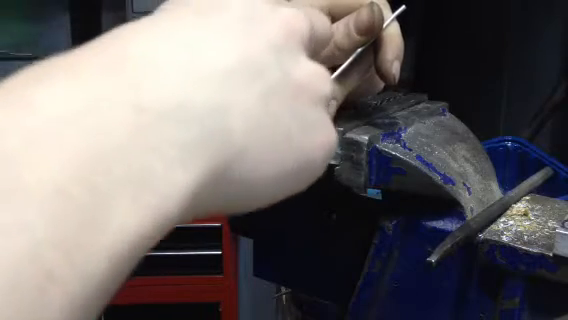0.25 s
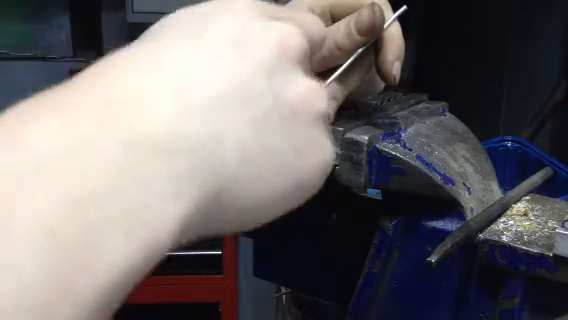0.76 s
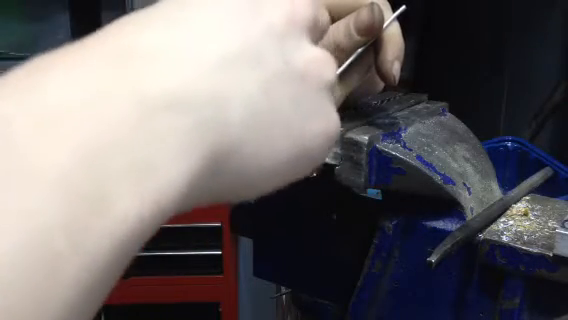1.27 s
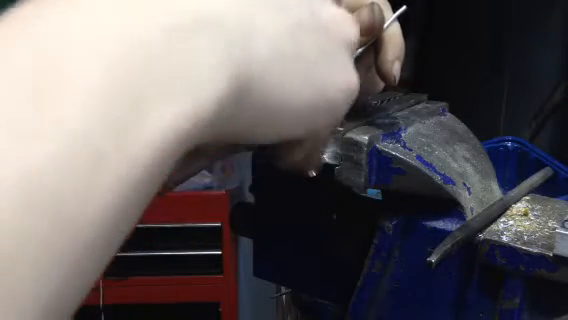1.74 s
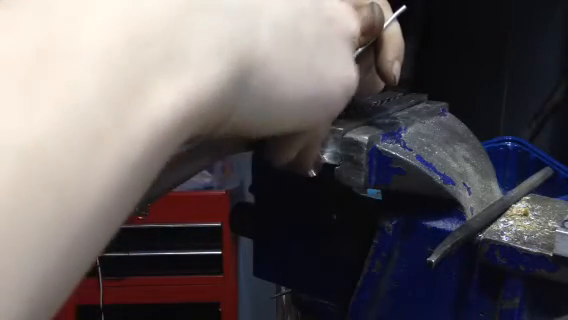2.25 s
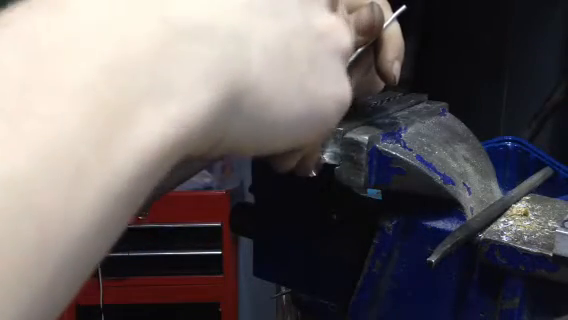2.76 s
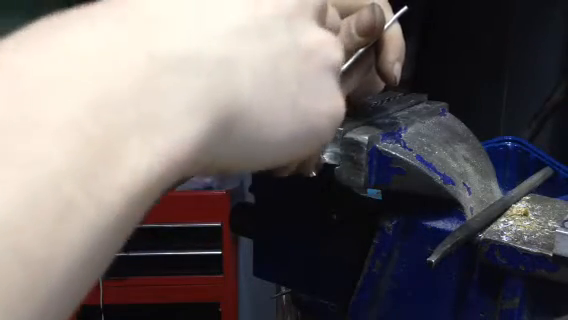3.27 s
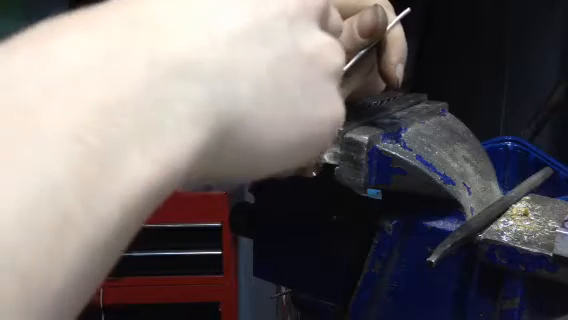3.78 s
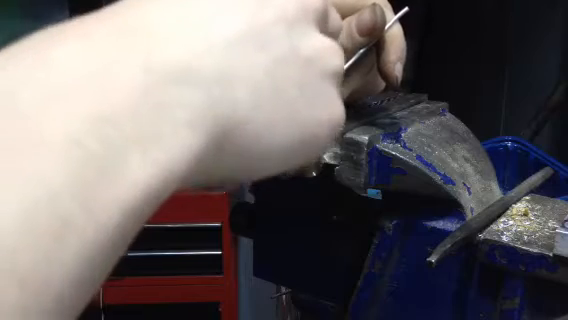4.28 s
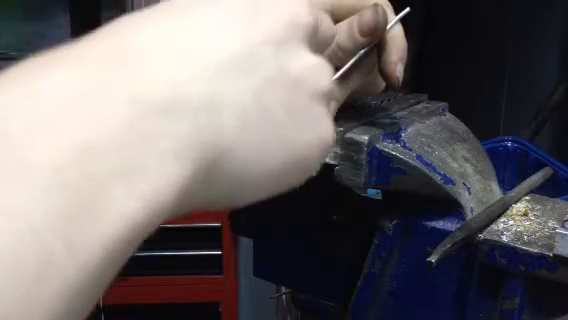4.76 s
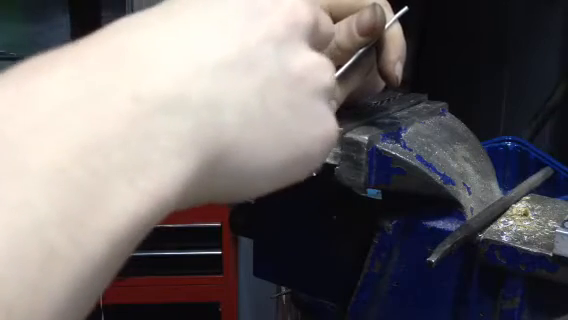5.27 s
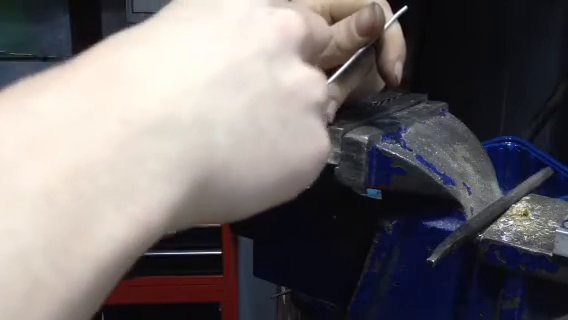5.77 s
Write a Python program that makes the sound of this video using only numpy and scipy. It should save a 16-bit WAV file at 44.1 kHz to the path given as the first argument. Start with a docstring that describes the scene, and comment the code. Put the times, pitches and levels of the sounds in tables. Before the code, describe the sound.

A quiet, steady electrical hum, low with a raspy high-pitched buzz, lies over faint hiss for the whole six seconds; its high edge dips slightly around 0.7 and 1.5 s. A very faint scrape of the pick opens the scene, leading to a modest, bright metallic click at 0.21 s. A barely audible dull tick and scrape pass at 0.85 s. Then mostly hum until a tiny scrape and soft touch at 2.4 s and a faint low bench thud at 2.5 s. The hardest, loudest snap strikes at 2.8 s, steel ringing briefly over a dull vise knock. Another crisp snap follows at 3.2 s. A tight, brighter double click comes at 4.47 s, faint ticks at 5.2 and 5.45 s, and a strong double snap at 5.89 s with a small trailing click. Close microphone; short, small-room reflections.

```python
"""Lock picking in a vise

In a small workshop a pick works the pins of a lock clamped in a bench vise. Pins let go in snaps of shaped
noise; steel rings as decaying sines, and the vise knocks as damped resonances under a soft push. Faint
scrapes of noise and one low bench thud join in. Snaps and knocks excite a short noise-built room tail.
Below lie a lamp ballast, summed from wavering partials, and a faint hiss of shaped noise."""
import sys
import numpy as np
from scipy import signal
from scipy.fft import rfft, irfft
from scipy.io import wavfile
from scipy.ndimage import uniform_filter1d

SR = 44100
rng = np.random.default_rng(int(sys.argv[2]) if len(sys.argv) > 2 else 0)


def materialize(psi):
    """Save the field psi as 16-bit PCM at rate SR to the path in sys.argv[1].

    A 1-D psi becomes a single channel; in a 2-D psi each row is a channel.
    """
    bounded = np.clip(np.atleast_2d(psi).T, -1, 1)
    quanta = np.round(bounded * 32767).astype(np.int16)
    wavfile.write(sys.argv[1], SR, quanta)


N = 265967

# Steady hiss of room and microphone. Each row: frequency in Hz, relative density in dB per Hz.
HISS_COLOUR = [(25, -9), (70, -12), (130, 3.5), (220, 8.5), (400, 2.5), (900, -2), (1600, -2.5), (3000, -4),
               (4600, -4.5), (6300, 1), (8000, -13), (10000, -16), (12500, -12), (15000, -8)]
HISS_DB = -70.5

# Partials of the ballast. Each row: multiple of the buzz rate, level in dB relative to HUM_DB.
BALLAST_PARTIALS = [(1, -20), (2, 0), (3, -23), (4, -18), (5, -22), (6, -29), (7, -22), (8, -32), (9, -35),
                    (10, -32), (11, -27), (12, -24), (13, -16), (14, -20), (15, -26), (16, -23), (17, -33),
                    (18, -32), (19, -24), (20, -34), (21, -28), (22, -24), (23, -24), (24, -31), (25, -32),
                    (26, -32), (27, -24), (28, -22), (29, -22), (30, -28), (31, -21), (32, -32), (33, -29),
                    (34, -23), (35, -32), (36, -25), (37, -9), (38, -11), (39, -17), (40, -20), (41, -29),
                    (42, -27), (43, -22), (44, -26), (45, -29), (46, -31), (47, -14), (48, -23), (49, -28),
                    (50, -30), (51, -23), (52, -22), (53, -23), (54, -32), (55, -38), (56, -34), (57, -28),
                    (58, -35), (59, -32), (60, -38), (61, -36), (62, -33), (63, -35), (64, -31), (65, -30),
                    (66, -39), (67, -42), (68, -40), (69, -38), (70, -42), (71, -45), (72, -47), (73, -43),
                    (74, -46), (75, -44), (76, -41)]
BUZZ_HZ, HUM_DB = 119.986, -58.5
# The picking hand rises into the path of the high buzz (minus) or sinks clear of it (plus).
# Each row: middle in seconds, half length (to 1/e) in seconds, change in dB.
HAND_MOVES = [(0.72, 0.25, -1.5), (1.55, 0.14, -2), (2.8, 1.6, 0.56)]
# Highest partials: level with the hand at rest, rms waver; both shrink to nothing below 1 kHz.
HIGH_BUZZ_DB, WAVER_DB = 1.06, 1

# Decay of the workshop. Each row: frequency in Hz, t60 in seconds.
ROOM_DECAY = [(200, 0.37), (700, 0.19), (1500, 0.19), (4000, 0.17), (8000, .15), (14000, .13)]

# Colour of the keyway scrape. Each row: frequency in Hz, relative density in dB per Hz.
SCRAPE_COLOUR = [(300, -9), (800, -4), (1300, -18), (1600, 2), (1800, 9.5), (2050, -11), (2400, 3),
                 (3300, -2.5), (5000, -12), (9000, -34)]
# Strokes of the pick in the keyway. Each row: start in seconds, length in seconds, level in dB before grain.
STROKES = [(0.0, 0.12, -65.5), (0.848, 0.06, -77), (2.397, 0.037, -73)]
STROKE_ATTACK_S, STROKE_RELEASE_DB_PER_S = 0.0053, 130

# Low resonances of the bench. Each row: frequency in Hz, level in dB, t60 in seconds.
BENCH_MODES = [(208, -54, 0.2), (360, -47.5, 0.032)]
BUMP_S = 2.519

# Dull knocks of the lock against the vise jaws. Each row: start in seconds, level in dB, pitch factor,
# extra level of the lowest resonance in dB.
KNOCKS = [(0.2150, -42.5, 1.0, -12), (0.8510, -62, 1, -5), (2.4060, -62.5, 1.02, 7),
          (2.4320, -67, 0.94, 20.5), (2.8062, -29, 1.07, -4.5), (3.2228, -31, 1.01, 2.5),
          (4.4755, -34.5, 0.99, 4), (5.1985, -59, 1.1, 2), (5.2030, -55.5, 0.97, 8), (5.4590, -60, 1.04, 5),
          (5.8902, -29.5, 1.02, -10)]
# Damped resonances of the clamped lock. Each row: frequency in Hz, relative level in dB, t60 in seconds.
CLAMP_MODES = [(660, -14, 0.044), (1186, -15.5, 0.095), (1474, 0.5, 0.036), (1589, -0.5, 0.036),
               (1900, -5.5, 0.0092)]

# Pin snaps and pick rebounds; where the pick is touched favours one band. Each row: start in seconds,
# level in dB, treble above 9 kHz in dB, body below 1 kHz in dB, ring in dB, favoured band in Hz, its lift in dB.
SNAPS = [(0.2090, -45, -14, 7, 7, 3920, 3), (0.2133, -31.5, -10, -2, -1, 4100, 8),
         (0.848, -56.5, -4, 14, 1, 870, 14), (2.8040, -24, -4, 1.5, 2.5, 4400, 2),
         (3.22, -28, 2.5, 5.5, 0, 14500, 3), (4.4709, -27, 1, 1, 6, 7300, 5),
         (4.4796, -30.5, 5.5, -11, -3.5, 6100, 7.5), (5.4541, -55, 6, 5, -2, 1900, 5),
         (5.889, -26.5, 1, -3, -4, 3470, 3.5), (5.8947, -29, -3, 10.5, -1.5, 2200, 10.5),
         (5.9145, -39, -8, -1, -9, 3450, 19)]
# Colour of a snap. Each row: frequency in Hz, relative density in dB per Hz.
SNAP_COLOUR = [(50, -48), (150, -16), (450, -14), (850, -11), (1500, 0), (2600, -3.5), (3900, 3.5),
               (5100, -3.5), (6000, -1), (7800, -4), (9700, -19), (12200, -20.5), (14500, -16.5)]
# Bright pick-tip resonances lifting that colour. Each row: frequency in Hz, half width (to 1/e) in Hz, lift in dB.
TIP_LIFTS = [(10900, 520, 1.5), (12260, 500, 6), (14100, 480, 3)]
# Ringing of pick, lock and vise. Each row: frequency in Hz, relative level in dB, t60 in seconds.
STEEL_MODES = [(1179, -13, .16), (1480, -4, .15), (1600, -12, .12), (1712, -14, .13), (1937, -4, .13),
               (2110, -16, .12), (2250, -16, .16), (2480, -15, .11), (2931, -11, .12), (2979, -7, .12),
               (3500, -14, .12), (3603, -14, .14), (3879, -8, .12), (3977, -7, .13), (4215, -10, .1),
               (4380, -11, .12), (4626, -10, .15), (4802, -15, .13), (5141, -17, .11), (5520, -15, .1),
               (5762, -10, .12), (5930, -11, .1), (6013, -7, .13), (6250, -17, .14), (7386, -15, .09),
               (7700, -18, .1)]
# First, hardest contact: decay, and treble level relative to the later chatter.
HARD_T60_S, HARD_DB = 0.034, 3.5

EDGE_HZ = 15330


def gain_of(db):
    """Decibels to amplitude."""
    return 10 ** (np.asarray(db) / 20)


def evened(x):
    """Scales to an rms of one."""
    return x / np.sqrt(np.mean(x ** 2) + 1e-20)


def read(points, hz):
    """Interpolates a table on a logarithmic frequency axis."""
    f, value = np.transpose(points)
    return np.interp(np.log(hz + 1), np.log(f + 1), value)


def add(mix, start_s, sound):
    """Mixes a sound in at a given time."""
    part = mix[max(round(start_s * SR), 0):][:len(sound)]
    part += sound[:len(part)]


def fade(t, t60_s):
    """Exponential decay by 60 dB in t60."""
    return np.exp(-np.log(1000) * t / t60_s)


def hump(x, centre, width):
    """Bell of height one, in frequency or in time."""
    return np.exp(-((x - centre) / width) ** 2)


def mode(t, hz, t60_s):
    """One dying vibration, started at a random phase."""
    return fade(t, t60_s) * np.sin(2 * np.pi * (hz * t + rng.random()))


def noise(colour):
    """Steady noise of a given spectrum, rms one."""
    spectrum = rfft(rng.standard_normal(N))
    gain = gain_of(read(colour, np.fft.rfftfreq(N, 1 / SR)))
    return evened(irfft(spectrum * gain, N))


def causal(db):
    """Minimum-phase pulse: the most compact causal one with this spectrum, at unit energy."""
    log_gain = np.log(gain_of(np.concatenate([db, db[-2:0:-1]])))
    pulse = np.fft.ifft(np.exp(np.conj(signal.hilbert(log_gain)))).real
    return pulse / np.linalg.norm(pulse)


def rattle(envelope, passes=4):
    """Burst of random contacts: alternately flattens the spectrum and restores the envelope."""
    burst = envelope * rng.standard_normal(len(envelope))
    for _ in range(passes):
        burst = irfft(np.exp(1j * np.angle(rfft(burst))), len(envelope))
        power = abs(uniform_filter1d(burst ** 2, size=96))
        burst *= envelope / np.sqrt(power + 1e-14)
    return burst


def hiss():
    """Steady coloured noise of room and microphone."""
    return gain_of(HISS_DB) * noise(HISS_COLOUR)


def ballast(rattle_t60_s=0.048, waver_sines=12):
    """The core is pulled twice a mains cycle; each pull rattles it, and the upper partials waver a little."""
    t, slow_t = np.arange(N) / SR, np.linspace(0, N / SR, num=128)
    # partial phases of one decaying noise burst per pull
    cycle_t = np.arange(round(SR / BUZZ_HZ)) / SR
    phase = np.angle(rfft(rng.standard_normal(len(cycle_t)) * fade(cycle_t, rattle_t60_s)))
    shade_db = HIGH_BUZZ_DB + sum(db * hump(slow_t, s, half_s) for s, half_s, db in HAND_MOVES)
    buzz = np.zeros(N)
    for multiple, db in BALLAST_PARTIALS:
        k = round(multiple)
        waver = evened(sum(np.sin(2 * np.pi * (f * slow_t + rng.random())) / np.sqrt(f)
                           for f in np.geomspace(0.4, 4, waver_sines)))
        # long waves bend round the hands; only short ones are shaded
        shortness = np.clip((k * BUZZ_HZ - 1000) / 3500, 0, 1)
        level = gain_of(HUM_DB + db + shortness * (shade_db + WAVER_DB * waver))
        buzz += np.interp(t, slow_t, level) * np.cos(2 * np.pi * k * BUZZ_HZ * t + phase[k])
    return np.sqrt(2) * buzz


def workshop(x, first_s=0.0067):
    """Dense reflections from bench and walls, each band dying at its own speed."""
    hz, t, grid = signal.stft(rng.standard_normal(SR // 3), SR, nperseg=256)
    decay = fade(t, read(ROOM_DECAY, hz)[:, None])
    tail = signal.istft(grid * decay, SR, nperseg=256)[1]
    # silent until first_s, full at twice that
    tail *= np.clip(np.arange(len(tail)) / SR / first_s - 1, 0, 1)
    return signal.fftconvolve(x, tail / np.linalg.norm(tail))[:N]


def scrape(grain_db=2, grain_samples=130):
    """The pick scrapes along the keyway in strokes: quick hold, kept pressure, easing off; it catches unevenly."""
    t, pressure = np.arange(N) / SR, np.zeros(N)
    for start_s, length_s, level_db in STROKES:
        attack = np.clip((t - start_s) / STROKE_ATTACK_S, 0, 1)
        release_db = STROKE_RELEASE_DB_PER_S * np.maximum(t - start_s - length_s, 0)
        pressure += attack * gain_of(level_db - release_db)
    grain = evened(uniform_filter1d(rng.standard_normal(N), size=grain_samples))
    return noise(SCRAPE_COLOUR) * pressure * gain_of(grain_db * grain)


def bump(rise_s=0.005):
    """A hand nudges the bench: low modes sound as one faint thud."""
    t = np.arange(SR // 3) / SR
    thud = sum(gain_of(db) * mode(t, f, t60_s) for f, db, t60_s in BENCH_MODES)
    return (1 - np.exp(-t / rise_s)) * thud


def knock(level_db, pitch, depth_db, push_s=0.0059):
    """The lock rocks in the jaws: one soft push builds up its damped resonances."""
    t = np.arange(SR // 6) / SR
    push = np.sin(np.pi * np.minimum(t / push_s, 1))
    sound = np.zeros(len(t))
    for k, (f, db, t60_s) in enumerate(CLAMP_MODES):
        envelope = signal.fftconvolve(push, fade(t, t60_s))[:len(t)]
        gain = gain_of(db + depth_db * (k == 0))
        tone = np.sin(2 * np.pi * (f * pitch * t + rng.random()))
        sound += gain * envelope / envelope.max() * tone
    return gain_of(level_db) * sound


def snap(level_db, treble_db, body_db, ring_db, band_hz, band_db,
         rise_s=0.00048, t60_s=0.057, steel_db=-9, band_width=0.14, size=8192):
    """A pin lets go: metal chatters briefly and leaves the steel ringing; returns chatter and ring."""
    t, hz = np.arange(size) / SR, np.fft.rfftfreq(size, 1 / SR)
    attack = 1 - np.exp(-t / rise_s)
    touch_db = band_db * hump(hz, band_hz, band_width * band_hz)
    colour_db = read(SNAP_COLOUR, hz) + touch_db
    colour_db += sum(db * hump(hz, f, width) for f, width, db in TIP_LIFTS)
    colour_db += treble_db / (1 + (9000 / (hz + 1)) ** 10)
    colour_db += body_db / (1 + (hz / 1000) ** 2)
    # the highest pitches live only in the first, hardest contact
    hard = 1 / (1 + (8500 / (hz + 1)) ** 10)
    first = gain_of(HARD_DB) * rfft(rattle(attack * fade(t, HARD_T60_S)))
    later = rfft(rattle(attack * fade(t, t60_s)))
    contacts = hard * first + (1 - hard) * later
    chatter = irfft(contacts * rfft(causal(colour_db)))
    ring = sum(gain_of(db + np.interp(f, hz, touch_db)) * mode(t, f, life_s) for f, db, life_s in STEEL_MODES)
    return gain_of(level_db) * chatter, gain_of(level_db + ring_db + steel_db) * attack * ring


def scene():
    """Snaps, rings, knocks, thud and scrapes over buzz and hiss; snaps, knocks and thud feed the room."""
    snaps, rings, knocks = np.zeros((3, N))
    for start_s, *blow in SNAPS:
        chatter, ring = snap(*blow)
        add(snaps, start_s, chatter)
        add(rings, start_s, ring)
    for start_s, *blow in KNOCKS:
        add(knocks, start_s, knock(*blow))
    add(knocks, BUMP_S, bump())
    room = workshop(gain_of(-9) * snaps + gain_of(-20) * knocks)
    background = hiss() + ballast()
    return (background + room + scrape() + knocks + rings + snaps)[None]


def record(dry):
    """Steep linear-phase low-pass: the recorder's band limit."""
    edge = signal.firwin(701, EDGE_HZ, window=("kaiser", 8), fs=SR)
    return signal.oaconvolve(dry, edge[None], "same")


dry = scene()
out = record(dry)
materialize(out)
```